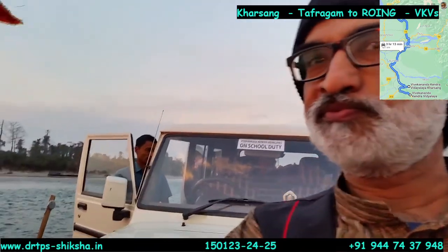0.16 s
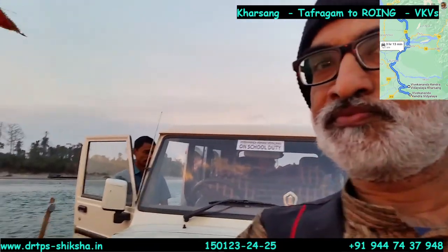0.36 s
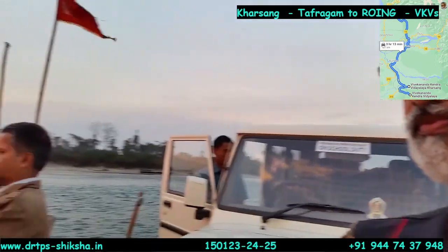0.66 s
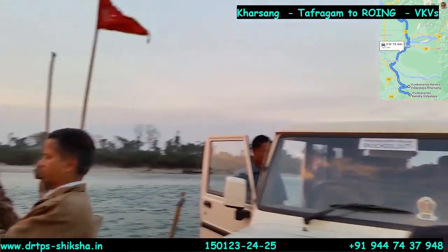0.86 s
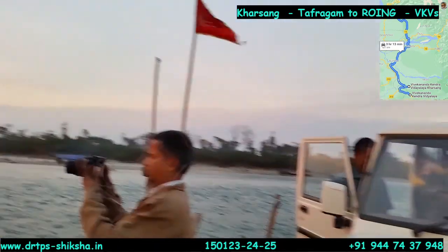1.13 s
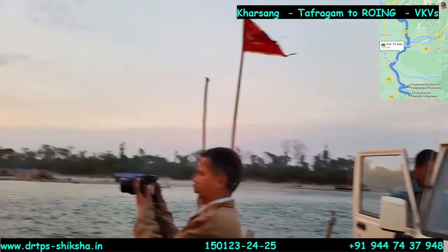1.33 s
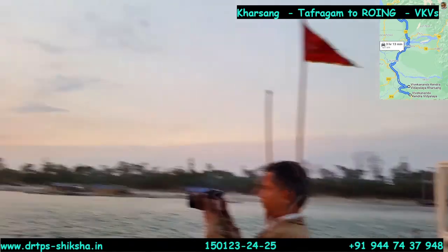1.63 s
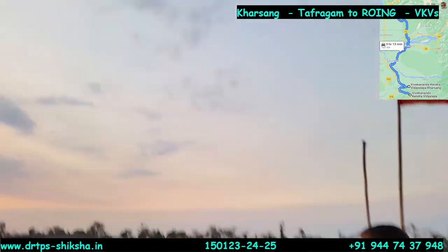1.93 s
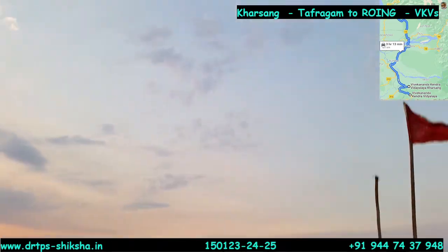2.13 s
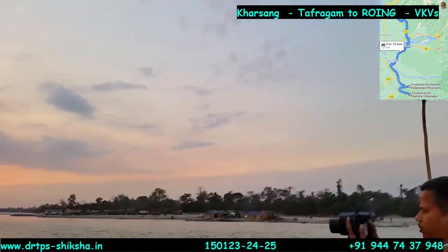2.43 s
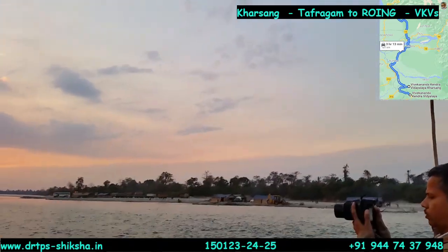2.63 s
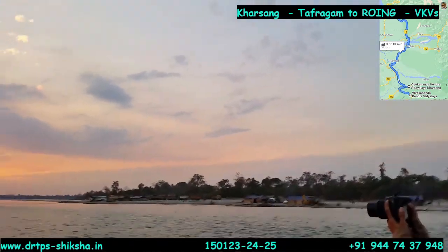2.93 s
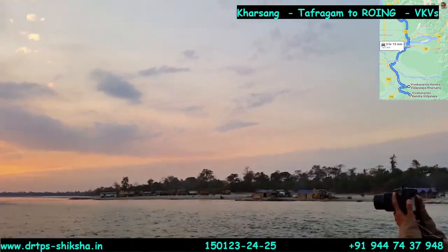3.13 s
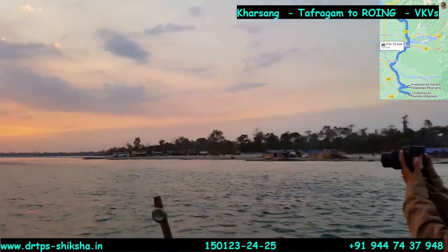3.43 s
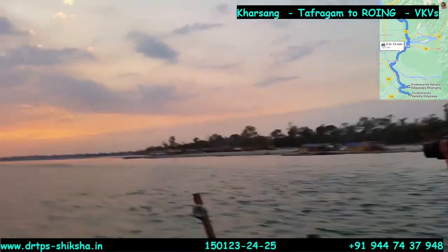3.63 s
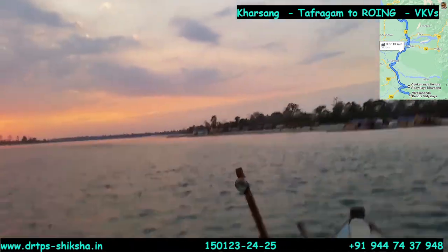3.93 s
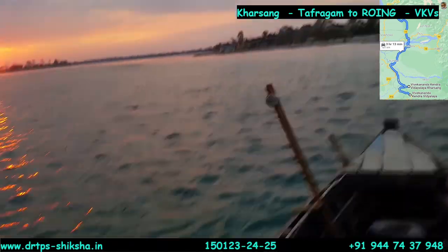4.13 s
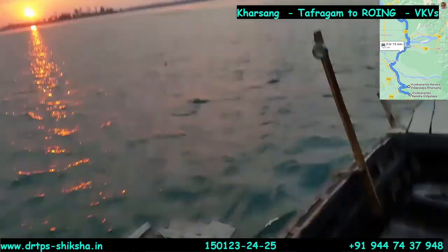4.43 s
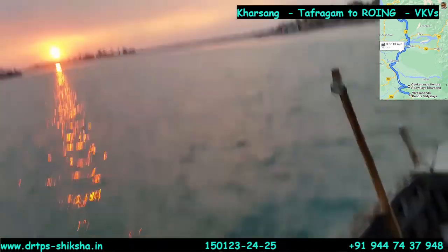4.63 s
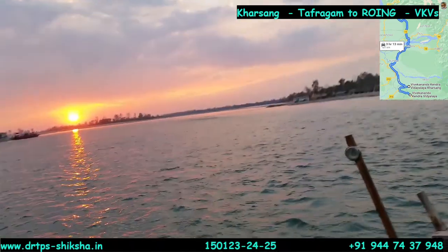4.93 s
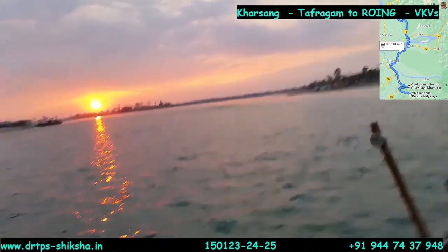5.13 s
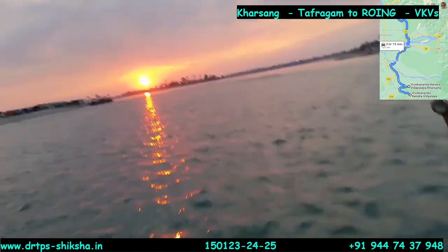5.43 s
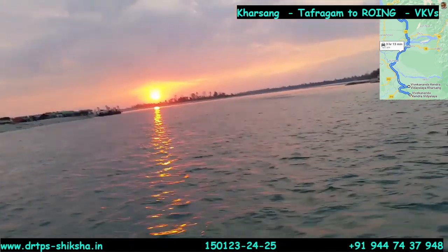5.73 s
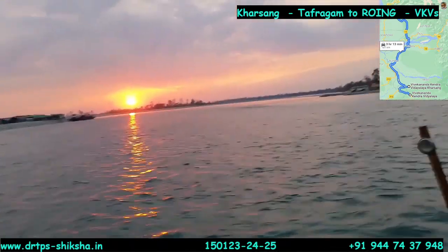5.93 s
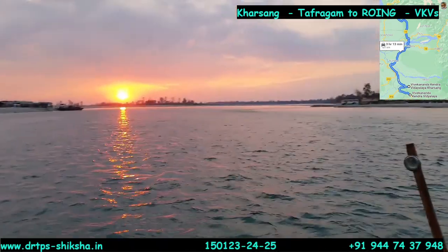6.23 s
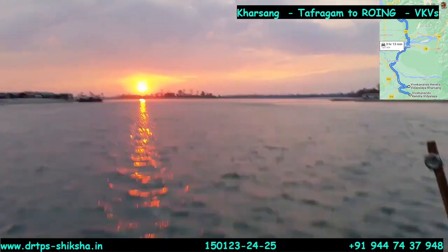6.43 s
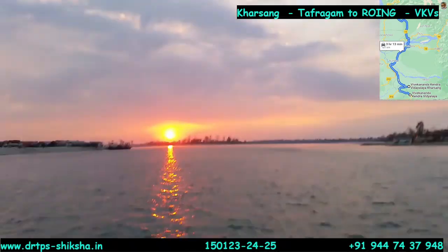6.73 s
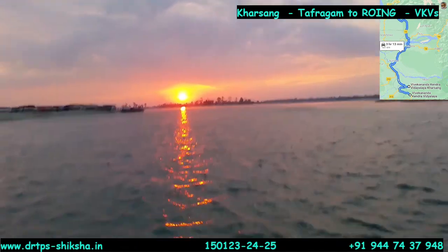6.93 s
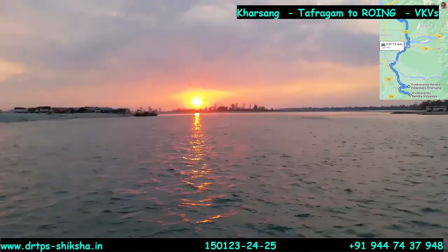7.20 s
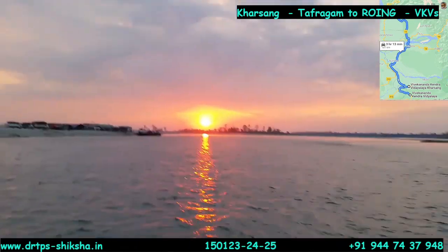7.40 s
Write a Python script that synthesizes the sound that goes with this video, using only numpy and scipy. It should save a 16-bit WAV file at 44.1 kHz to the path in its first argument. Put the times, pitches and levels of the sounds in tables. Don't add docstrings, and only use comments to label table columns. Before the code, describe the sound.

Aboard a vehicle ferry, a steady buzzing diesel drone fills both sides above low rumbling water. Handling noise sits very close on the left: isolated taps, then ratcheting creaks, a short squeak and hard clicks. Gusts thud softly there. The engine sinks markedly after the loudest clicks, swells back by six seconds, then a split-second gap interrupts it near the end.

```python
import sys
import numpy as np
from scipy import signal
from scipy.fft import rfft, irfft
from scipy.io import wavfile
from scipy.ndimage import uniform_filter1d

SR = 44100
rng = np.random.default_rng(int(sys.argv[2]) if len(sys.argv) > 2 else 0)


def generate_wav(sig):
    pcm = np.round(np.clip(np.atleast_2d(sig).T, -1, 1) * 32767).astype(np.int16)
    wavfile.write(sys.argv[1], SR, pcm)


N = 333396


def undb(db):
    return 10 ** (np.asarray(db) / 20)


def unit(x):
    return x / np.sqrt(np.mean(x ** 2))


def curves(table):
    s, *columns = np.transpose(table)
    return [np.interp(np.arange(N) / SR, s, c) for c in columns]


def on_log_hz(table, hz):
    f, v = np.transpose(table)
    return np.interp(np.log(hz), np.log(f), v)


def walk(rate_hz):
    k = int(SR / rate_hz)
    held = np.repeat(rng.standard_normal(N // k + 1), k)
    return 1.5 * uniform_filter1d(uniform_filter1d(held, k), k)[:N]


def noise(table, flicker_db, rate_hz, alike=((100, 0), (200, 0)), pan=((100, 0), (200, 0))):
    hz = np.fft.rfftfreq(N, 1 / SR) + 1e-3
    inside = (hz > table[0][0]) & (hz < table[-1][0])
    mid, side = rfft(rng.standard_normal((2, N))) * undb(on_log_hz(table, hz)) * inside
    likeness = np.clip(on_log_hz(alike, hz), -1, 1)
    mid = mid * np.sqrt(1 + likeness)
    side = side * np.sqrt(1 - likeness)
    lean = undb(on_log_hz(pan, hz) / 2)
    ports = np.array([(mid + side) * lean, (mid - side) / lean])
    out = 0
    for octave in range(int(np.log2(table[0][0])), int(np.log2(table[-1][0])) + 2):
        share = np.cos(np.pi / 2 * np.clip(np.log2(hz) - octave, -1, 1)) ** 2
        out = out + irfft(ports * share, N) * undb(flicker_db * walk(rate_hz))
    return unit(out)


def above(total_db, under_db):
    return np.sqrt(np.maximum(undb(total_db) ** 2 - undb(under_db) ** 2, 0))


# [multiple of firing rate, level/dB]
EXHAUST = [(0.249, -31.5), (0.5, -24), (0.75, -28), (1, -2), (1.25, -14), (1.499, -31.5), (2, 0.5),
           (2.25, -19), (2.5, -13), (2.748, -36), (3, -1), (3.25, -18), (3.499, -34.5), (3.75, -21),
           (4, -18), (4.25, -23.5), (4.5, -30.5), (4.75, -37.5), (5, -24.5), (5.25, -32.5), (5.5, -26),
           (5.75, -39), (6, -28), (6.25, -32), (6.5, -34.5), (6.75, -31.5), (7, -35.5), (7.5, -36),
           (7.75, -38), (8, -31.5)]
# [t/s, f/Hz]
FIRING_RATE = [
    (0.0, 59.99),
    (2.57, 60.99),
    (6.17, 61.03),
    (6.21, 61.86),
    (7.35, 61.89),
    (7.56, 59.24),
]
FIRING_S = (.0135, 7.186)
BOOM_DB, BOOM_SWAY_DB = -8.5, 1.5
BOOM_FADES_S, BOOM_FADE_DB = 7.26, -10


def exhaust(spread=1.0, dip=4.03, lean_db=1.06, lag=0.15):
    fade = np.clip((np.arange(N) / SR - BOOM_FADES_S) / .05, 0, 1)
    boom_db = BOOM_DB + BOOM_SWAY_DB * walk(5) + BOOM_FADE_DB * fade
    first, last = (int(s * SR) for s in FIRING_S)
    cycles = np.cumsum(curves(FIRING_RATE)[0]) / SR
    cycles -= cycles[first]
    turn = 2 * np.pi * cycles * np.round(cycles[last]) / cycles[last] + dip
    ports = np.array([[.5], [-.5]])
    out = 0
    for k, db in EXHAUST:
        loose = 1 if k % 1 == 0 else 6
        phase = k * turn - spread * k ** 2 + loose * .07 * walk(9)
        phase = phase + (k % 1 > 0) * 2 * np.pi * rng.random()
        db = db + (k == 1) * (boom_db + 6.5) + loose * 0.5 * walk(12)
        gain = undb(db) * undb(lean_db * min(k - 1, 4) * ports)
        out = out + gain * np.cos(phase + lag * k * ports)
    return unit(out)


# [f/Hz, level/dB per Hz]
HULL = [(30, -34.5), (42, -2.5), (80, 4.5), (150, 2), (260, -8), (420, -18), (680, -21), (900, -25.5),
        (2500, -36.5), (4000, -45.5), (5000, -62), (6500, -63.5)]
# [f/Hz, level/dB]
HULL_PAN = [(60, 0.3), (200, 1.84), (700, 4.5), (1300, 3.2), (4400, 2.2), (9000, 2.75)]
# [f/Hz, correlation, clipped to -1..1]
HULL_ALIKE = [(60, 0.6), (250, 1.07), (640, 0.17), (1400, -0.34), (3100, 0.25), (7000, -1.5)]


def hull():
    return undb(-7.5) * noise(HULL, 1.0, 14, HULL_ALIKE, HULL_PAN)


# [f/Hz, level/dB per Hz]
DECK = [(330, -6.5), (370, -4), (430, -6), (500, 2), (580, -5.5), (650, 0.5), (720, -16)]
# [t/s, level/dB]
FACING = [
    (0.0, -20),
    (1.4, -22.5),
    (2.2, -37.5),
    (5.8, -34.5),
    (6.8, -25),
    (7.56, -31),
]


def deck():
    return undb(curves(FACING)[0]) * noise(DECK, 1.5, 30, HULL_ALIKE, HULL_PAN)


# [t/s, level/dB]
BOAT = [(0.0, -12.5), (1.24, -11.5), (1.89, -13), (2.15, -12.5), (2.3, -15.5), (3.3, -16), (3.54, -15),
        (3.94, -11.5), (4.25, -15), (4.38, -13.5), (4.61, -22.5), (4.9, -26), (5.14, -24.5), (5.4, -21.5),
        (5.77, -15.5), (6.23, -11.5), (6.74, -12), (7.56, -12.5)]


def boat(hum_db):
    return undb(hum_db + 0.38) * (exhaust() + hull() + deck())


# [first t/s, last t/s, tick level/dB, knock level/dB]
CREAKS = [(1.32, 1.4253, -50, -39), (1.6718, 1.7437, -47, -30), (1.9368, 2.0575, -33, -27),
          (2.2318, 2.3277, -19.5, -11.5), (2.3386, 2.403, -16.5, -12.5), (2.4152, 2.4593, -24, -15.5),
          (2.478, 2.5199, -26.5, -15.5), (2.5298, 2.5689, -29, -15), (2.7612, 2.8046, -36, -21),
          (2.8222, 2.8973, -34.5, -27), (2.945, 3.0835, -43, -31.5), (3.2492, 3.3144, -28, -25),
          (3.7133, 3.738, -29.5, -18), (4.1229, 4.1771, -32, -16.5), (4.1831, 4.2227, -17.5, -10),
          (4.2343, 4.272, -39, -21.5), (4.5834, 4.608, -17.5, -15.5), (4.6239, 4.6239, -26, -28),
          (4.7772, 4.797, -50, -36), (4.8242, 4.8412, -34, -24), (4.8524, 4.8841, -29.5, -24),
          (5.2558, 5.2738, -33.5, -20.5), (5.2835, 5.294, -45, -20), (5.3015, 5.3215, -31.5, -17)]
CREAK_RATES = [9.5, 28, 42, 94, 93, 116, 95, 80, 93, 94, 29, 78, 160, 55, 51, 26, 80, 80, 103, 170, 94, 110,
               97, 103]
CREAK_JITTER, CREAK_SCATTER_DB = .07, 3
THUMP_DB, THUMP_SLOPE = -2.5, 0.42


def creaks():
    rows = []
    chances = rng.standard_normal((len(CREAKS), 16, 4))
    for (first, last, high, mid), rate, chance in zip(CREAKS, CREAK_RATES, chances):
        s = np.linspace(first, last, round((last - first) * rate) + 1)
        late, *uneven = chance[:len(s)].T
        s[1:-1] += CREAK_JITTER / rate * late[1:-1]
        levels_db = np.array([[high], [mid], [THUMP_DB + THUMP_SLOPE * mid]])
        rows += zip(s, *(levels_db + CREAK_SCATTER_DB * np.array(uneven)))
    return rows


# (f/Hz, 60 dB decay/s)
THUMP, BODY, KNOCK, RAP, TICK = (480, .015), (1000, .007), (1400, .006), (2400, .003), (3850, .004)


def ring(mode, hz_scale, size):
    hz, decay_s = mode
    t = np.arange(size) / SR
    push = 1 - np.exp(-4 * hz * t)
    return push * np.sin(2 * np.pi * hz * hz_scale * t) * np.exp(-np.log(1000) * t / decay_s)


# [t/s, tick level/dB, knock level/dB, thump level/dB]
SLIPS = [(0.6556, -31, -20.5, -21), (1.0979, -13, -12.5, -5.5), (1.5567, -8, -9, 1),
         (1.7269, -7, -14, -2.5), (1.8495, -45, -33, -5.5), (1.8927, -19, -20, -4),
         (1.9207, -13.5, -13.5, -3.5), (2.0241, -19, -17, -10), (2.1164, -26, -36, -4),
         (2.6284, -22, -6.5, -7.5), (2.6671, -21, -21, -1.5), (2.6977, -20, -11, -2),
         (2.7199, -23, -13, -10), (2.755, -22, -14.5, -10), (3.7871, -29, -38, -5),
         (3.8765, -25.5, -20, -3.5), (4.0701, -27, -30.5, -7), (4.113, -15, -11, -1.5),
         (4.1447, -30, -24, -2.5), (4.2545, -47, -20, -8.5), (4.4567, -5.5, -9, -26),
         (4.466, -15.5, -16, -3.5), (4.6801, -13.5, -23, -5), (4.7075, -24.5, -20.5, -7),
         (4.8079, -30.5, -18.5, -7), (6.0988, -32.5, -16, -4.5), (6.4115, -32, -9, -28),
         (6.6461, -29, -19, -14), (7.5065, -24.5, -14.5, -32), (7.5571, -22, -26, -15)]
SQUEAL = (2.118, 2.188, 256, -28, -11)  # start/s, end/s, slips per s, first dB, last dB
SNAP_SLOPE = 1.13


def finger(thump_db=4.5, knock_db=4, body_db=4, rap_db=0.0, tick_db=8, snap_db=-1, far_db=-23, cavity_hz=4500):
    start, end, rate, first_db, last_db = SQUEAL
    s = np.arange(start, end, 1 / rate)
    db = np.interp(s, (start, end), (first_db, last_db)) + 3.0 * rng.standard_normal(len(s))
    slips = SLIPS + creaks() + list(zip(s, db - 19, db - 2, db - 3))
    case, snaps = np.zeros(N + 2048), np.zeros(N + 2048)
    chance = rng.standard_normal((len(slips), 10))
    chance[-len(s):] = 3, -4, 0, 0, 0, 0, 0, 0, 0, 0
    for (s, high, mid, low), c in zip(slips, chance):
        scale = 1 + .05 * c
        hit = undb(high + tick_db) * ring(TICK, scale[0], size=1024)
        hit -= undb((high + mid) / 2 + rap_db) * ring(RAP, scale[3], size=1024)
        hit += undb(mid + knock_db) * ring(KNOCK, scale[1], size=1024)
        hit += undb(mid + body_db) * ring(BODY, scale[0], size=1024)
        grains = np.zeros(64)
        grains[0] = 1
        grains[[7, 16, 23, 37, 50, 63]] = 0.16 * c[4:]
        hit = np.convolve(hit, grains)[:1024]
        hit[12:] -= undb(low + thump_db) * ring(THUMP, scale[2], size=1012)
        i = int(s * SR)
        case[i:i + 1024] -= hit
        snaps[i:i + 2] += undb(SNAP_SLOPE * high + snap_db) * np.array([1, -1])
    cavity = signal.cheby2(4, 30, 1.32 * cavity_hz, fs=SR, output="sos")
    case = signal.sosfilt(cavity, case)
    return np.outer([1, undb(far_db)], (case + snaps)[:N])


# [t/s, gust level/dB, rub level/dB (finger pressure)]
PORT = [(0.0, -37, -55), (1.49, -37, -55.5), (1.94, -28.5, -53.5), (2.36, -25.5, -56), (2.88, -33, -59.5),
        (3.2, -38, -59), (3.54, -32.5, -58), (3.78, -25, -54), (4.1, -29, -55), (4.38, -30.5, -55),
        (4.51, -44, -61.5), (4.75, -41, -66.5), (5.05, -52.5, -70), (5.58, -42, -64.5), (6.23, -35, -54.5),
        (6.8, -32.5, -54.5), (7.05, -35, -47.5), (7.25, -32.5, -53.5)]
# [f/Hz, level/dB per Hz]
RUB = [(800, 0), (1500, 2.5), (2600, 1.5), (3800, 6.5), (4600, -7), (6000, -29.5)]


def rub(hum_db):
    rub_db = curves(PORT)[1]
    return above(rub_db, hum_db - 43) * undb(18.5) * noise(RUB, 2.66, 40)


# [f/Hz, level/dB per Hz]
BUFFET = [(40, -6.5), (120, 1.5), (300, 0.5), (500, -8.5), (800, -14.5), (1500, -23), (2500, -33.5)]


def buffet(hum_db):
    gust_db = curves(PORT)[0]
    return above(gust_db, hum_db - 25) * undb(11.0) * noise(BUFFET, 4.1, 60)


# [f/Hz, level/dB per Hz]
WASH = [(4200, -10), (5000, -11), (6300, -9.5), (7500, -11.5), (8300, -9.5), (12000, -3), (13900, 3),
        (14400, -6), (15000, -4)]
WASH_DB, WASH_SLOPE, WASH_LAG_S = -49, 1.16, 0.22
GATE_DB, GATE_SLOPE = -23, 2.8
HISS_LIFT_S = 7.05


def wash(hum_db):
    late_db = np.r_[np.full(int(WASH_LAG_S * SR), hum_db[0]), hum_db][:N]
    late_db = np.minimum(late_db, hum_db)
    wash_db = WASH_DB + WASH_SLOPE * (late_db - hum_db[0]) + GATE_SLOPE * np.minimum(late_db - GATE_DB, 0)
    pan = ((6000, 1.6), (8000, 6), (10000, 10), (11500, 5.0), (14000, -7.5))  # f/Hz, left minus right/dB
    hiss = undb(wash_db + 4.5) * noise(WASH, 1.9, 90, pan=pan)
    lift_db = 4.5 * np.exp(-((np.arange(N) / SR - HISS_LIFT_S) / 0.062) ** 2)
    return hiss * undb(lift_db)


def scene():
    hum_db, = curves(BOAT)
    left = np.array([[1], [undb(-25.0)]])
    return boat(hum_db) + finger() + left * (rub(hum_db) + buffet(hum_db)) + wash(hum_db)


def starve(x):
    low_hz, high_hz, keep_db = 4300, 10500, -85.5
    hz, _, z = signal.stft(x, SR, nperseg=2048)
    bands = z[:, :1024].reshape(2, 128, 8, -1)
    power = np.mean(np.abs(bands) ** 2, axis=2)
    masker_db = 10 * np.log10(np.mean(power[:, 2:12], axis=1, keepdims=True) + 1e-12)
    keep_db = keep_db + np.clip(.6 * (uniform_filter1d(masker_db, size=9) + 62), -9, 7)
    keep_db = keep_db + 5.5 * uniform_filter1d(rng.standard_normal(power.shape), size=3)
    keep_db = keep_db - 9 * ((hz[:1024:8, None] - 7000) / 3000) ** 4
    faint = np.repeat(power < undb(2 * keep_db), 8, axis=1)
    in_range = (hz[:1024] > low_hz) & (hz[:1024] < high_hz)
    z[:, :1024] *= ~(faint & in_range[:, None])
    return signal.istft(z, SR, nperseg=2048)[1][:, :N]


def band_limit(x):
    return signal.sosfilt(signal.butter(12, 15690, fs=SR, output="sos"), x)


TOP_HZ = 14600
GAP_S = (7.1906, 7.2013)
# [t/s, size]
JUMPS = [
    (7.2013, 0.58),
    (7.2073, 0.18),
]


def record(dry):
    t = np.arange(N) / SR
    soft = starve(np.tanh(0.67 * dry) / 0.77)
    cut = signal.sosfilt(signal.ellip(6, .3, 32, TOP_HZ, fs=SR, output="sos"), soft)
    cut = cut + .13 * np.exp(-np.abs(t - GAP_S[0]) / .002)
    cut = cut * ((t < GAP_S[0]) | (t >= GAP_S[1]))
    for s, size in JUMPS:
        cut = cut + size * (t >= s) * np.exp(-np.abs(t - s) / 0.0013)
    return band_limit(cut)


dry = scene()
out = record(dry)
generate_wav(out)
```